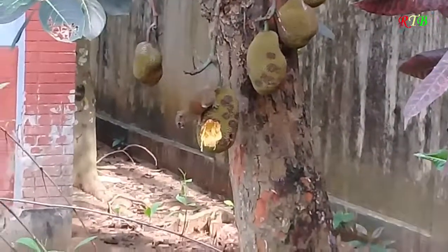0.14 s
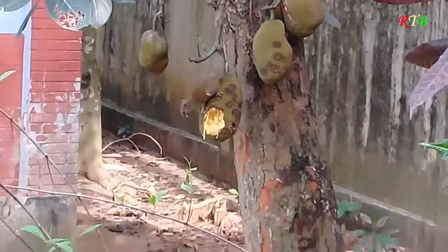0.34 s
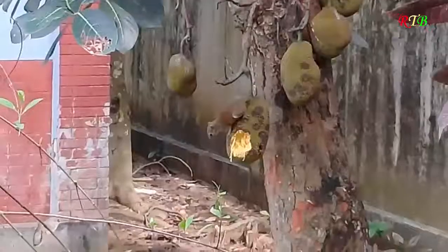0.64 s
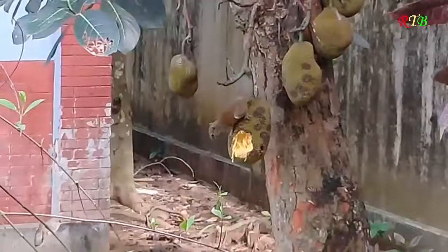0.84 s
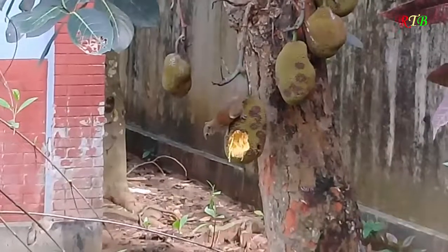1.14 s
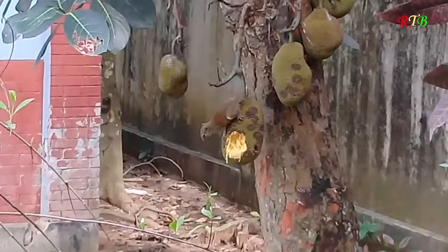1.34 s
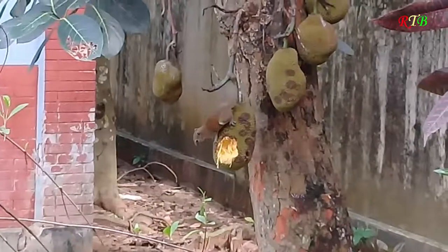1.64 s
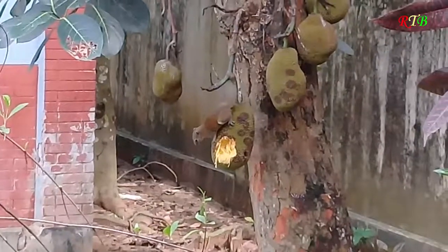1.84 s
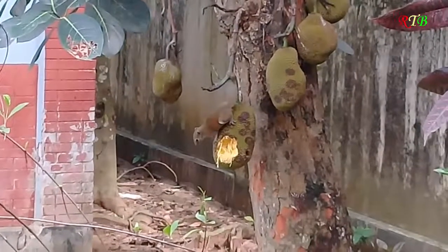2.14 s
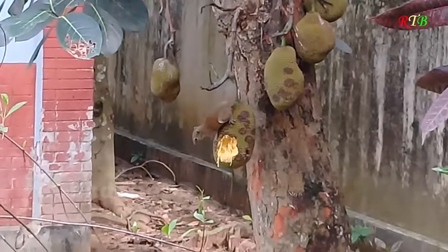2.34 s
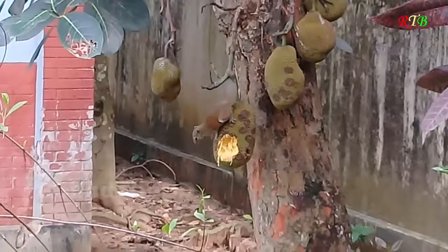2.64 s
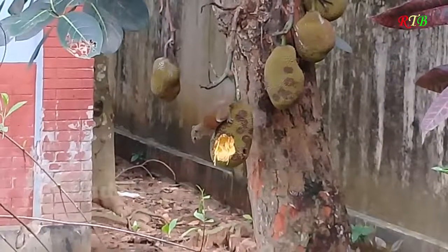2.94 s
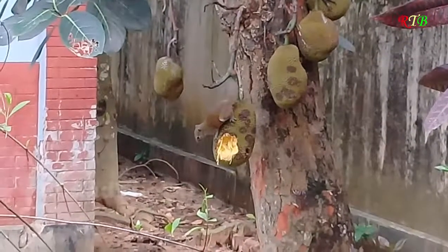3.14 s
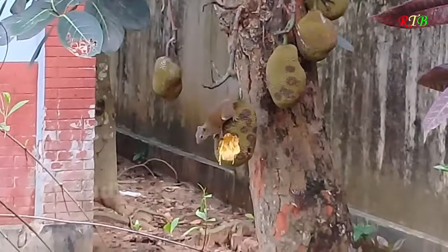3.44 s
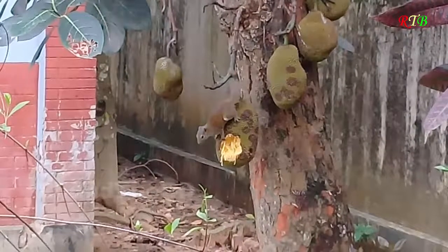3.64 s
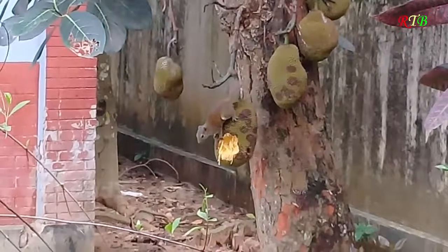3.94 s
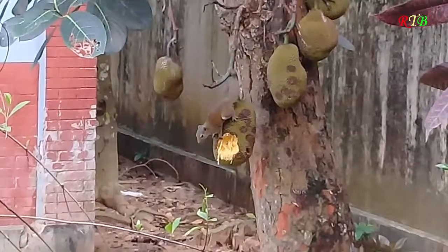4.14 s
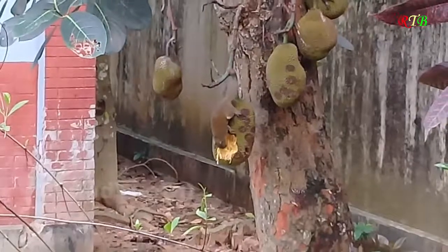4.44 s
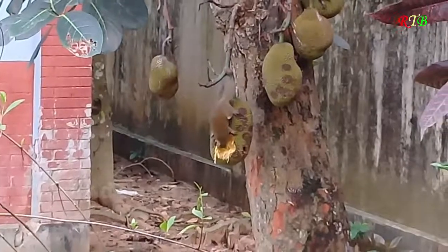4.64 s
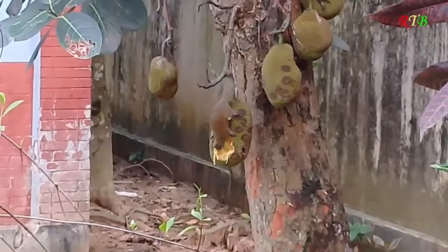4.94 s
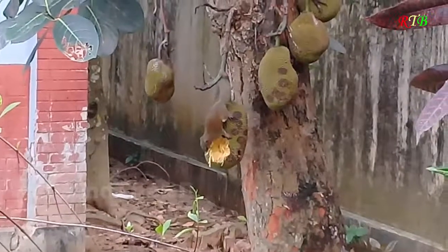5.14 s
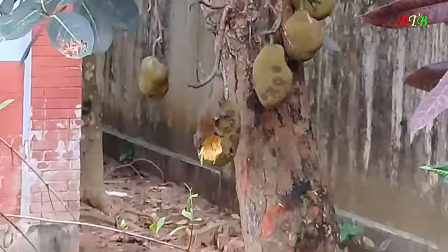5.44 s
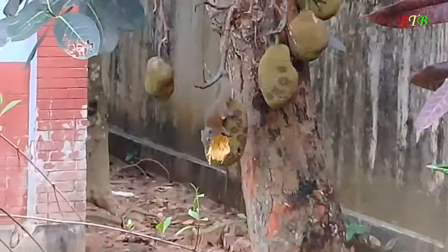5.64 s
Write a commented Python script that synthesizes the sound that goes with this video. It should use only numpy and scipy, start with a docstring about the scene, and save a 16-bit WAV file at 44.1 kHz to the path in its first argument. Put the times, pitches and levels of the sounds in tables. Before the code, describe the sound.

Quiet outdoor yard with faint raspy bird calls and a low rumble, then five sharp, loud squirrel chatter smacks close by near the end.

```python
"""Five sharp smacks close by, most likely the chatter of a squirrel on a fruit tree, sound near the end in a walled yard.
Each pops, rings the hollow of the mouth, cracks with filtered noise, flutters quickly down in pitch and dies in the yard.
Birds, gliding sines with a raspy pitch, call from the trees. Dull bumps on the microphone and small ticks are bursts of
resonant noise. Coloured noise makes the low distant rumble, leaves, far twitter and thin insect hiss."""
import sys
import numpy as np
from scipy import signal
from scipy.fft import rfft, irfft
from scipy.io import wavfile

SR = 44100
rng = np.random.default_rng(int(sys.argv[2]) if len(sys.argv) > 2 else 0)


def bounce(signal):
    """Save signal as a 16-bit WAV file at the path given by the first command-line argument."""
    frames = np.transpose(np.atleast_2d(signal))
    limited = np.clip(frames, -1, 1)
    pcm = np.round(limited * 32767).astype(np.int16)
    wavfile.write(sys.argv[1], SR, pcm)


N = 255780
TIME = np.arange(N) / SR

# level of the distant rumble, before a small trim: (time [s], level [dB])
RUMBLE_LEVEL = [(0.0, -56), (0.39, -55), (0.45, -57), (4.8, -58)]
# colours of the rumble, leaf hiss and insect hiss: (frequency [Hz], density [dB per Hz])
RUMBLE_COLOUR = [(15, -64), (25, -10), (43, -10.5), (61, -0.5), (80, 1), (216, -5.5), (378, -17.5),
                 (550, -24), (627, -24), (689, -25), (1430, -33.5), (2200, -36), (2860, -45), (4840, -120)]
LEAF_COLOUR = [(500, -4), (1000, 9), (2200, 11), (4500, 5), (6500, 0.5), (8000, 1.5), (10000, 3),
               (12000, 4), (15000, -4.5)]
INSECT_COLOUR = [(4000, -32), (4900, -4.5), (5450, 1), (5850, -3.5), (6400, -20)]
# dry leaves stir: (start [s], length [s], level [dB])
RUSTLES = [(0.335, 0.1, -68.5), (2.435, 0.49, -71.5), (4.234, 0.23, -79.5)]
# colour of the stirring leaves: (frequency [Hz], density [dB per Hz])
RUSTLE_COLOUR = [(1500, -28), (3000, 1), (4200, 3), (5500, -1), (7200, -12.5), (9000, -18)]
# spells of far birds blurred into one twitter: (start [s], length [s], starting level [dB])
TWITTER_SPELLS = [(0.4, 3.4, -67.5), (4.15, 1.7, -78)]
# colour of the twitter: (frequency [Hz], density [dB per Hz])
TWITTER_COLOUR = [(1800, -81), (2400, -4.5), (2900, 4.5), (3400, 11), (3750, -4), (4600, -52)]
# thin, wavering high tones: (start [s], length [s], pitch [Hz], level [dB])
TRILLS = [(.45, 0.39, 7200, -80.5), (0.677, 0.49, 6700, -82), (.88, 0.71, 7800, -85.5),
          (2.3, 0.33, 8000, -87), (3.13, 0.7, 8000, -83.5), (4.627, 0.64, 7950, -85)]
# dull bumps on the housing: (time [s], level [dB], centre [Hz], width [Hz], t60 [s])
BUMPS = [(.312, -47.5, 153, 117, 0.26), (.378, -54, 172, 100, 0.081)]
# small dry ticks: (time [s], level [dB], centre [Hz], width [Hz], t60 [s])
TICKS = [(.334, -60, 4900, 2600, 0.032), (.431, -52.5, 1000, 800, 0.025), (2.47, -63, 3900, 4880, 0.025),
         (4.2738, -44, 9250, 6000, 0.01), (4.831, -44.5, 1420, 3040, 0.0065),
         (5.2563, -39.5, 1460, 1320, 0.017)]
# one bird repeats a long falling call: (start [s], starting level [dB])
FALLING_CALLS = [(-.17, -56), (0.864, -59.5), (3.1, -58), (5.17, -59.5)]
# single whistles of other birds:
# (start [s], length [s], start pitch [Hz], end pitch [Hz], level [dB], rasp [Hz], attack [share of length])
WHISTLES = [(-.02, 0.12, 1973, 1930, -73, 40, .07), (0.074, 0.22, 1873, 1815, -56.5, 49.7, 0.48),
            (0.458, 0.12, 3070, 3183, -55.5, 136, 0.01), (0.577, 0.22, 3437, 3204, -58.5, 77, 0.059),
            (0.618, 0.19, 3173, 2660, -56, 71, .1), (1.23, .12, 3150, 2750, -70, 170, .2),
            (1.503, 0.1, 3310, 2800, -75, 170, .2), (1.643, 0.19, 2498, 2483, -64, 140, 0.13),
            (1.796, .11, 3160, 2740, -66.5, 228, .1), (2.068, 0.12, 2880, 2720, -69.5, 130, .2),
            (2.367, 0.1, 2900, 2730, -73, 130, 0.18), (2.639, 0.081, 3246, 3110, -67, 140, .1),
            (2.728, 0.15, 2914, 2850, -71.5, 121, .2), (3.045, 0.086, 2780, 2485, -69.5, 201, 0.18),
            (3.258, .1, 3350, 3300, -68, 110, .3), (3.631, 0.099, 3064, 3100, -72, 79.4, .1),
            (3.649, 0.074, 3360, 3780, -67.5, 121, .1), (4.132, 0.091, 3074, 3140, -64.5, 190, .15),
            (4.417, .07, 3130, 2960, -76, 100, .2), (4.44, 0.35, 2780, 2850, -73, 54.6, 0.023),
            (4.669, 0.4, 3255, 3240, -75, 40, 0.1), (4.701, 0.17, 3020, 3030, -72, 79.5, .2),
            (5.245, 0.021, 6020, 5750, -55, 200, 0.078)]
# low hoots: (start [s], length [s], starting pitch [Hz], level [dB])
HOOTS = [(-.02, 0.2, 800, -67.5), (0.015, 0.14, 622, -70), (.22, 0.256, 840, -65), (0.456, 0.056, 651, -58),
         (4.697, 0.35, 618, -74)]
# colour of the yard's echo: (frequency [Hz], level [dB])
YARD_COLOUR = [(100, 4.5), (280, 3.5), (420, -0.5), (540, 7), (900, -1), (1200, 3), (1500, -7), (1900, 3),
               (2250, -4), (2700, 2), (4000, 0.5), (8000, 0), (15000, -1.5)]
# near surfaces lift some pitches and cancel others: (centre [Hz], nominal width [Hz], gain [dB])
NEAR_SURFACES = [(270, 44, 5.5), (526.4, 22, 6), (840, 36, -0.5), (843, 39, 4), (1649, 69, 7.5),
                 (1980, 440, -8.5), (2230, 220, 4), (2417, 44, -17), (2450, 76, 1), (2990, 93, -12.5),
                 (4224, 396, -21.5), (4750, 390, 8.5), (6000, 120, 5)]
# colour of the smack's crack: (frequency [Hz], density [dB per Hz])
CRACK_COLOUR = [(200, -32.5), (600, -13.5), (1200, 8.5), (1900, 14), (2400, -1), (3000, -11.5), (3650, 9.5),
                (4300, 6), (4800, -3), (7000, -4), (9000, -6.5), (13000, -4.5), (16000, -15)]
# single flaps that trail a smack: (time [s], level [dB])
AFTER_SNAPS = [(5.1216, -21.5), (5.2824, -22.5), (5.2951, -22), (5.4491, -26), (5.459, -31), (5.6298, -25)]
# smacks: (time [s], first tick [dB], first pop [dB], second pop [dB], second pop's lag [s], hollow pitch [Hz],
#          hollow t60 [s], crack [dB], crack t60 [s], flutter [dB], starting flap rate [Hz],
#          slowing time [s], flutter swell [s], send to the yard [dB])
SMACKS = [(4.9660, -18, -2.5, -1.5, 0.003227, 2344, 0.0046, -16.5, 0.062, -26, 947, 0.0065, 0.0054, -20),
          (5.1105, -25, -8, -19.5, .0113, 1533, 0.0084, -12.5, 0.03, -21, 460.5, 0.00978, 0.0052, -22.5),
          (5.2713, -26, -4.5, -15, .0066, 1514, 0.0053, -19, 0.053, -26.5, 519, 0.0086, 0.0041, -23),
          (5.4219, -21.5, -9, -8, .0035, 1478, 0.018, -17, 0.092, -22.5, 621.2, .0115, 0.01, -22),
          (5.5979, -26, -7.5, -6, .0056, 1526, 0.02, -13, 0.067, -24, 662, 0.013, 0.01, -21.5)]

RUSTLE_ATTACK_S, RUSTLE_RELEASE_SHARE = 0.033, 0.73   # the release is a share of the length
RUSTLE_REST_DB = -82.5   # level between stirs
TWITTER_ATTACK_S, TWITTER_RELEASE_S, TWITTER_FADE_DB_PER_S = 0.3, 0.44, 3.5
FALL_HZ, FALL_HZ_PER_S, FALL_LENGTH_S = 4230, 1550, 0.4
FALL_FADE_DB_PER_S, FALL_RASP_HZ = 14.5, 95
# another bird pips evenly on one note
PIP_START_S, PIP_GAP_S, PIP_LENGTH_S = 1.15, .29, 0.16
PIP_HZ, PIP_DB, PIP_RASP_HZ = 3387, -71.5, 63
HOOT_SAG, HOOT_RASP_HZ = 0.029, 48   # share of its pitch that a hoot loses; pitch wobble
FALL_ATTACK, PIP_ATTACK, HOOT_ATTACK = 0.099, 0.043, .07   # shares of a note's length
STEADY_AIR, PUFFED_AIR = 0.43, 0.59   # shares of the crack: flowing all the time, and let through at each flap
RING_CARRIES = 0.091   # extra share of the hollow's ring that reaches the walls
ECHO_COLOURED = 0.79   # share of the yard's echo that comes back past the near surfaces
POP_LAG_S = .0008   # from the first tick to the first pop
# close echoes after the pops: mean spacing, the first one's loss, and how many times longer than the hollow they last
ECHO_GAP_S, ECHO_LOSS_DB, ECHO_LASTS = .006, 8.5, 5.2
CUTOFF_HZ = 15900


def from_db(db):
    """Decibels to gain."""
    return 10 ** (np.asarray(db) / 20)


def rms_one(x):
    """Scale to unit rms."""
    return x / np.sqrt(np.mean(x ** 2) + 1e-20)


def noise(spectrum, size=N):
    """Unit noise of a given colour, falling off beyond its ends."""
    hz, db = np.transpose(spectrum)
    f = np.maximum(np.fft.rfftfreq(size, 1 / SR), 1)
    skirts = np.minimum(1, f / hz[0]) ** 2 * np.minimum(1, hz[-1] / f) ** 2
    gain = from_db(np.interp(np.log(f), np.log(hz), db))
    white = rfft(rng.standard_normal(size))
    return rms_one(irfft(white * skirts * gain, size))


def drift(rate):
    """Smooth random wander with spread 1, mostly slower than the rate in Hz."""
    f = np.fft.rfftfreq(N, 1 / SR)
    return rms_one(irfft(rfft(rng.standard_normal(N)) / (1 + (f / rate) ** 2), N))


def decay(start, t60):
    """An envelope that jumps to 1 and dies away."""
    age = TIME - start
    return (age >= 0) * from_db(-60 * np.clip(age / t60, 0, 4))


def swell(start, length, attack, release):
    """An envelope that rises to 1, holds to the end of its length and falls."""
    rise = np.clip((TIME - start) / attack, 0, 1)
    fall = np.clip(1 - (TIME - start - length) / release, 0, 1)
    return rise * fall


def resonate(x, hz, width_hz):
    """One resonance with gain 1 on top."""
    r = np.exp(-np.pi * width_hz / SR)
    zeros = np.array([1, 0, -1]) * (1 - r * r) / 2
    poles = [1, -2 * r * np.cos(2 * np.pi * hz / SR), r * r]
    return signal.lfilter(zeros, poles, x)


def colour(x, resonances):
    """Lift or cut a few narrow bands."""
    for hz, width, db in resonances:
        g = from_db(db)
        x = x + (g - 1) * resonate(x, hz, width / np.sqrt(g))
    return x


def bass_cut(x, edge_hz):
    """Second-order high-pass."""
    return signal.sosfilt(signal.butter(2, edge_hz, "high", fs=SR, output="sos"), x)


def yard(x, t60, treble_t60, onset):
    """Diffuse echo from walls and leaves; the treble dies at a rate of its own."""
    wash = noise(YARD_COLOUR, size=SR)
    low = signal.sosfilt(signal.butter(1, 3000, fs=SR, output="sos"), wash)
    treble = wash - low
    tail = low * decay(0, t60)[:SR] + treble * decay(0, treble_t60)[:SR]
    echo = tail * (1 - np.exp(-TIME[:SR] / onset))
    return signal.fftconvolve(x, echo / np.sqrt(np.sum(echo ** 2)))[:N]


def distant_rumble(trim_db):
    """Low coloured noise whose level follows a slow curve."""
    level_db = np.interp(TIME, *np.transpose(RUMBLE_LEVEL))
    return from_db(level_db + trim_db) * noise(RUMBLE_COLOUR)


def leaves(hiss_db):
    """A steady leaf hiss, and dry leaves that stir in unsteady bursts of noise."""
    stirs = from_db(RUSTLE_REST_DB)
    for s, length, db in RUSTLES:
        stirs = stirs + from_db(db) * swell(s, length, RUSTLE_ATTACK_S, RUSTLE_RELEASE_SHARE * length)
    hiss = from_db(hiss_db) * noise(LEAF_COLOUR)
    return hiss + stirs * from_db(1.6 * drift(25)) * noise(RUSTLE_COLOUR)


def far_twitter():
    """Far birds blurred into fading spells of flickering noise."""
    spells = 0
    for s, length, db in TWITTER_SPELLS:
        fading = from_db(db - TWITTER_FADE_DB_PER_S * (TIME - s))
        spells = spells + fading * swell(s, length, TWITTER_ATTACK_S, TWITTER_RELEASE_S)
    return spells * from_db(2.8 * drift(19.0)) * noise(TWITTER_COLOUR)


def insects(level_db):
    """A thin band of hiss that wavers slightly in level."""
    return from_db(level_db + .5 * drift(12)) * noise(INSECT_COLOUR)


def trills(waver_hz):
    """Thin tones of wavering pitch that swell and fade."""
    waver, out = waver_hz * drift(400), 0
    for s, length, hz, db in TRILLS:
        arch = np.sqrt(2 * np.clip(1 - (2 * (TIME - s) / length - 1) ** 2, 0, 1))
        out = out + from_db(db) * arch * np.sin(2 * np.pi * np.cumsum(hz + waver) / SR)
    return out


def knocks(rows):
    """Short dying bursts, each in a broad double resonance of its own."""
    white, out = rng.standard_normal(N), 0
    for s, db, hz, width, t60 in rows:
        body = resonate(resonate(white, hz, width), hz, 2 * width)
        out = out + from_db(db) * decay(s, t60) * rms_one(body)
    return out


def bird_notes(pip_count):
    """Falling calls, pips, whistles and hoots: whistle columns plus a fade [dB per s]."""
    fall_end_hz = FALL_HZ - FALL_HZ_PER_S * FALL_LENGTH_S
    falls = [(s, FALL_LENGTH_S, FALL_HZ, fall_end_hz, db, FALL_RASP_HZ, FALL_ATTACK, FALL_FADE_DB_PER_S)
             for s, db in FALLING_CALLS]
    pips = [(PIP_START_S + k * PIP_GAP_S, PIP_LENGTH_S, PIP_HZ, PIP_HZ, PIP_DB, PIP_RASP_HZ, PIP_ATTACK, 0)
            for k in range(pip_count)]
    whistles = [(*whistle, 0) for whistle in WHISTLES]
    hoots = [(s, length, hz, hz * (1 - HOOT_SAG), db, HOOT_RASP_HZ, HOOT_ATTACK, 0)
             for s, length, hz, db in HOOTS]
    return falls + pips + whistles + hoots


def birds(overtone_db, direct_db):
    """Raspy gliding whistles, heard directly and by way of the walls and trees."""
    out, rasp = np.zeros(N), drift(262)
    for s, length, start_hz, end_hz, db, rasp_hz, attack, fade_db in bird_notes(pip_count=7):
        on = (TIME >= s) & (TIME < s + length)
        u = (TIME[on] - s) / length   # 0 to 1 through the note
        pitch = start_hz + (end_hz - start_hz) * u + rasp_hz * rasp[on]
        phase = 2 * np.pi * np.cumsum(pitch) / SR
        shape = (1 - np.exp(-u / attack)) * np.sqrt(2 * (1 - u ** 2))
        voice = np.sin(phase) + from_db(overtone_db) * np.sin(2 * phase)
        out[on] += from_db(db - fade_db * u * length) * shape * voice
    return from_db(direct_db) * out + from_db(-3.5) * yard(out, t60=0.52, treble_t60=0.82, onset=0.00066)


def pop_run(s, first_db, second_db, second_lag, hollow_t60, count, uneven_db):
    """Two pops, then close uneven echoes that die away: rows of (time [s], peak [dB])."""
    first = s + POP_LAG_S
    k = np.arange(count)
    times = first + second_lag + ECHO_GAP_S * (k + 1 + rng.uniform(-0.086, 0.09, count))
    fade_db = 60 * k * ECHO_GAP_S / (ECHO_LASTS * hollow_t60)
    levels = second_db - ECHO_LOSS_DB - fade_db + uneven_db * rng.standard_normal(count)
    return [(first, first_db), (first + second_lag, second_db), *zip(times, levels)]


def hollow_ring(pops, hz, t60, snap_db, snap_t60, rise, sag, scatter):
    """Every pop rings the hollow of the mouth and adds a snap; the pitch sags as the smack goes on."""
    hollow, snap = np.zeros(N), 0
    age = TIME[:SR // 40]
    for s, db in pops:
        first = round(s * SR)
        pitch = hz * np.exp(-sag * (s - pops[0][0]) + scatter * rng.standard_normal())
        envelope = (1 - np.exp(-age / rise)) * from_db(-60 * age / t60)
        ring = envelope / envelope.max() * np.sin(2 * np.pi * pitch * age)
        hollow[first:first + len(age)] += from_db(db) * ring
        snap = snap + from_db(db + snap_db) * decay(s, snap_t60)
    return hollow, snap


def flutter(start, first_hz, slow_s, swell_s, last_hz, overtone_db, lag, grain, puff_s, steepness):
    """A flapping that slows as the smack opens: its low falling tone, and the puff of air let through at each flap."""
    age = np.clip(TIME - start - lag, 0, .2)
    rate = last_hz + (first_hz - last_hz) * np.exp(-age / slow_s)
    cycles = last_hz * age + (first_hz - rate) * slow_s   # the rate summed over time
    phase = 2 * np.pi * cycles + grain * drift(300)
    u = age / swell_s
    envelope = (u * np.exp(1 - u)) ** steepness
    tone = envelope * sum(from_db(overtone_db * k) * np.cos((k + 1) * phase) for k in range(4))
    since_flap = (cycles % 1) / rate
    return tone, np.exp(-since_flap / puff_s)


def after_snaps(hiss, snap_t60, thump_db, thump_hz, thump_width_hz):
    """Last single flaps: a short crack over a small thump."""
    cracks, clicks = 0, np.zeros(N) + 1e-18
    for s, db in AFTER_SNAPS:
        cracks = cracks + from_db(db) * decay(s, snap_t60)
        clicks[round(s * SR)] = from_db(db + thump_db)
    # scaled so that a click of 1 rings with a peak near 1
    thumps = resonate(clicks, thump_hz, thump_width_hz) * SR / (2 * np.pi * thump_width_hz)
    return hiss * cracks + thumps


def smacks():
    """Five smacks: first tick, ringing hollow, crack and falling flutter, then the yard's answer."""
    hiss = noise(CRACK_COLOUR)
    direct = after_snaps(hiss, snap_t60=0.0047, thump_db=3.0, thump_hz=416, thump_width_hz=440)
    sent = from_db(-17.0) * direct   # what reaches the walls
    for (s, tick_db, first_db, second_db, second_lag, hz, t60, crack_db, crack_t60,
         flap_db, flap_hz, slow_s, swell_s, yard_db) in SMACKS:
        pops = pop_run(s, first_db, second_db, second_lag, t60, count=6, uneven_db=5.0)
        ring, snap = hollow_ring(pops, hz, t60, snap_db=-22.5, snap_t60=0.022,
                                 rise=0.00071, sag=3.4, scatter=0.034)
        tone, puffs = flutter(s, flap_hz, slow_s, swell_s, last_hz=204.2, overtone_db=-3.0,
                              lag=0.00013, grain=0.55, puff_s=0.0012, steepness=1.11)
        tick = from_db(tick_db) * decay(s, t60=0.0024)
        air = from_db(crack_db) * decay(s + POP_LAG_S, crack_t60) * (STEADY_AIR + PUFFED_AIR * puffs)
        smack = ring + hiss * (tick + snap + air) + from_db(flap_db) * tone
        direct = direct + smack
        sent = sent + from_db(yard_db) * (smack + RING_CARRIES * ring)
    echo = yard(sent, t60=0.38, treble_t60=0.35, onset=0.0092)
    near = colour(direct + ECHO_COLOURED * echo, NEAR_SURFACES)
    heard = near + (1 - ECHO_COLOURED) * echo
    return bass_cut(heard, edge_hz=152)   # too small a source to radiate deep bass


def scene():
    """Everything at one microphone."""
    background = distant_rumble(trim_db=0.15) + leaves(hiss_db=-75) + far_twitter()
    background = background + insects(level_db=-77) + trills(waver_hz=159.5)
    bumps = knocks(BUMPS)
    ticks = knocks(TICKS)
    tick_echo = from_db(-8.5) * yard(ticks, t60=0.25, treble_t60=0.16, onset=0.0027)
    calls = birds(overtone_db=-24.0, direct_db=-1.0)
    return (background + bumps + ticks + tick_echo + calls + smacks())[None]


def record(dry):
    """The top is cut steeply."""
    return signal.sosfilt(signal.ellip(10, .1, 70, CUTOFF_HZ, fs=SR, output="sos"), dry)


dry = scene()
out = record(dry)
bounce(out)
```